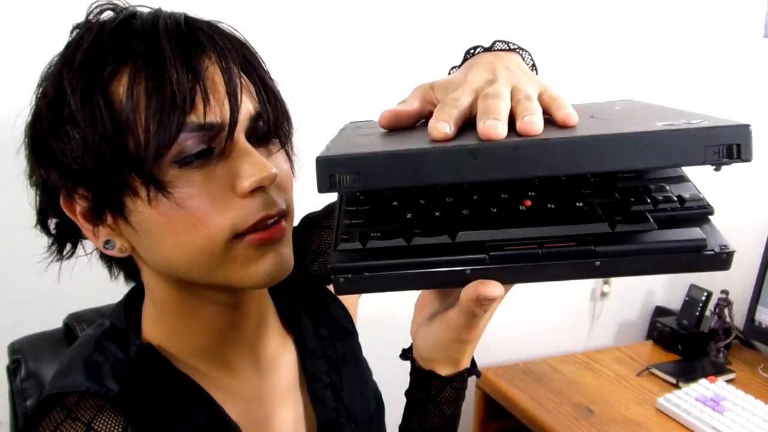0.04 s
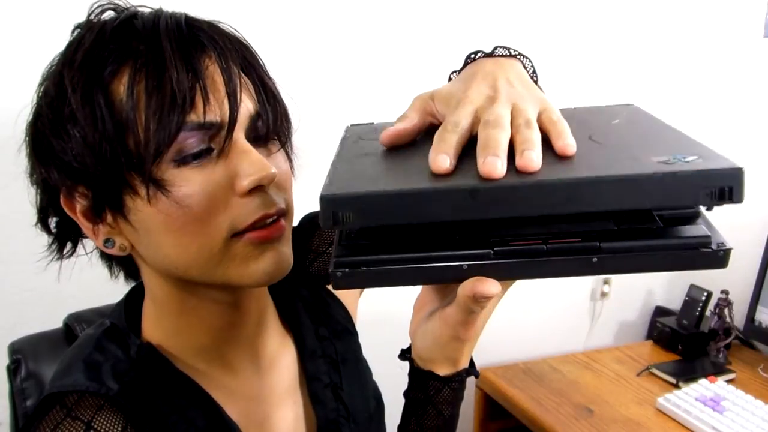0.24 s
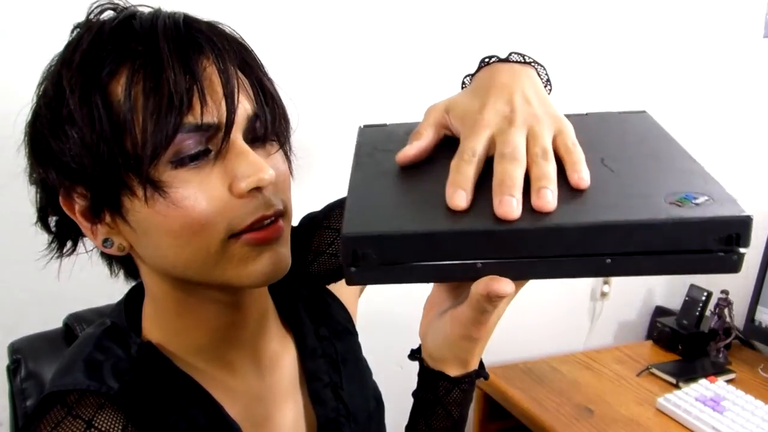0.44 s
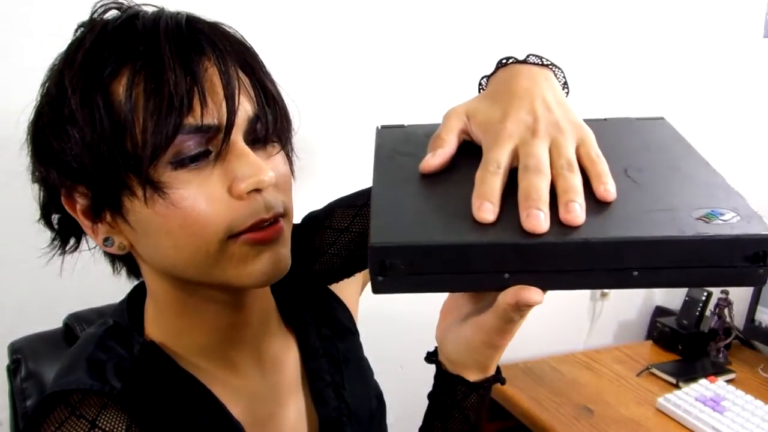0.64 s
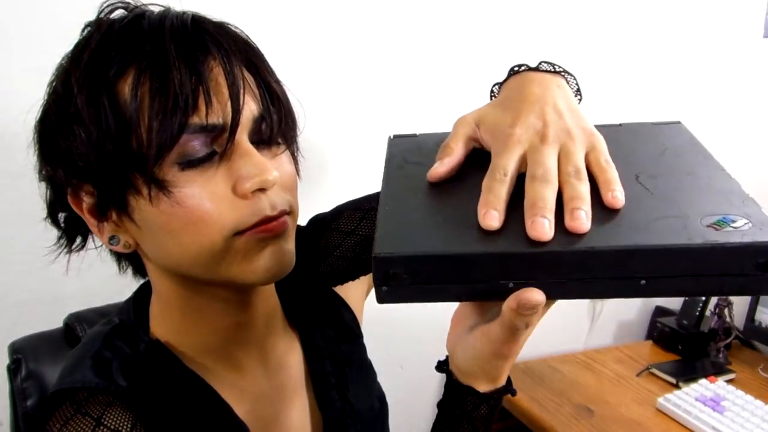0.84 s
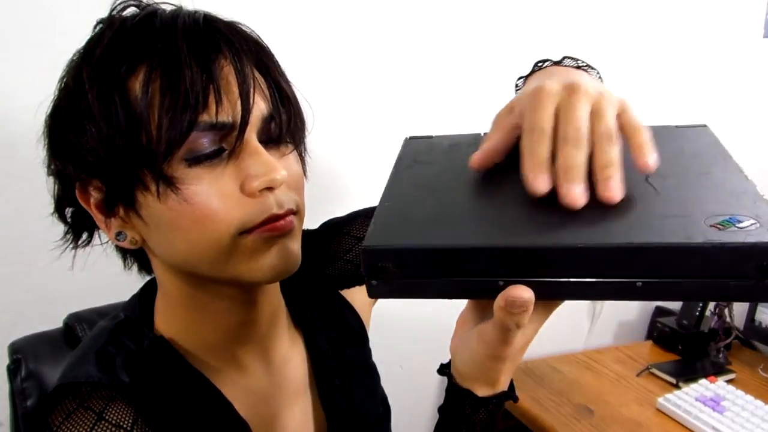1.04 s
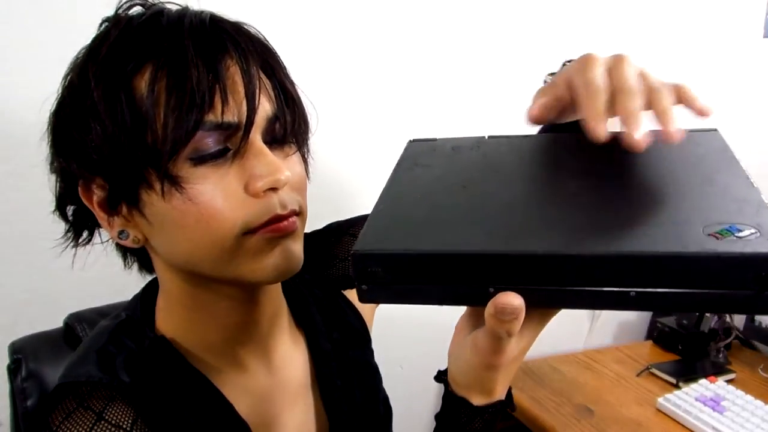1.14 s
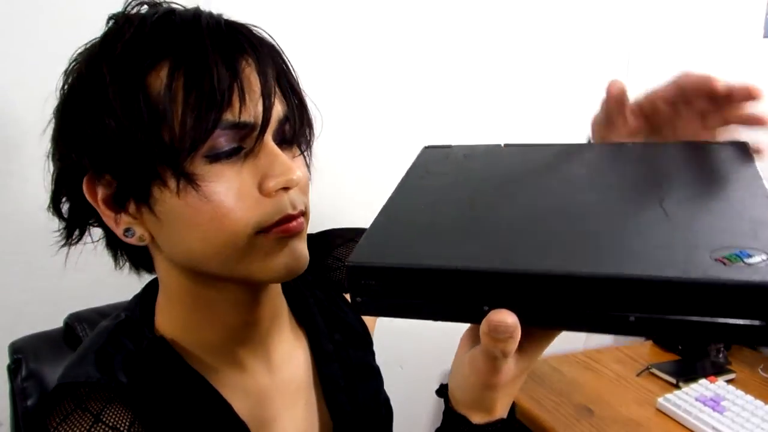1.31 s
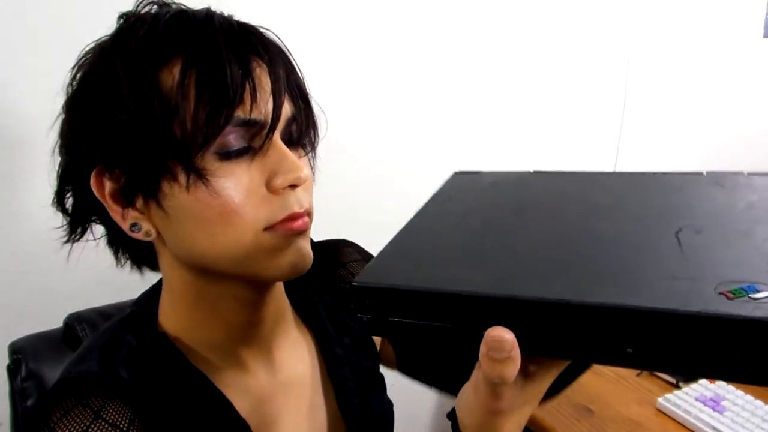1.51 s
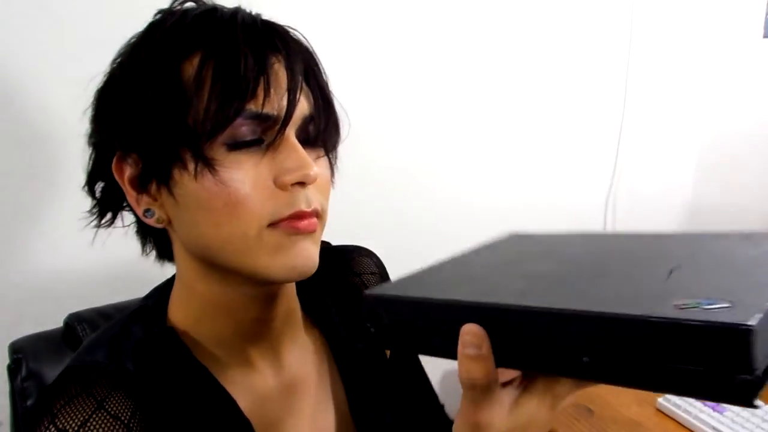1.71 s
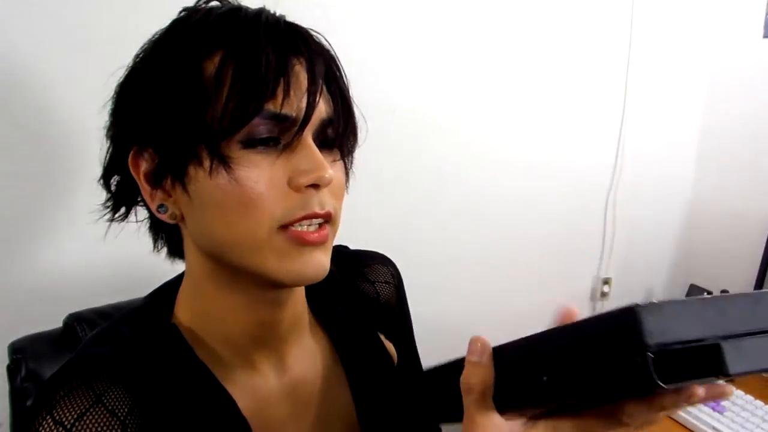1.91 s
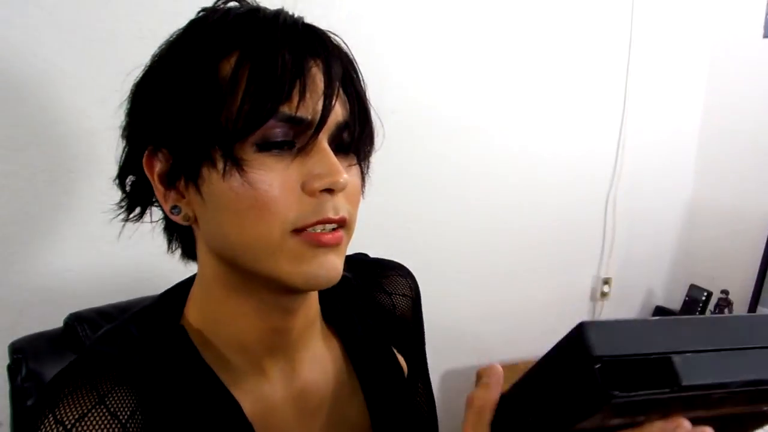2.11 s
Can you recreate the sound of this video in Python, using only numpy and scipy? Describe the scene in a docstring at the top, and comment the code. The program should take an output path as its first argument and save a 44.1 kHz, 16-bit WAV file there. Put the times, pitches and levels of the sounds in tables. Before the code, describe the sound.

An old laptop is pressed shut with three sharp plastic clacks, then handled.

```python
"""Three close plastic clacks, each a light touch and then a hard hit: an old laptop is pressed shut.
The lid lands, snaps into its metal latch and seats; the panels crack and the hollow base thuds and rings.
Then the closed case is tipped away: hands rub and knock on it and a small loose part chatters.
A small room answers, over a faint hiss and the rumble of air pushed against the microphone."""
import sys
import numpy as np
from scipy import signal
from scipy.fft import rfft, irfft
from scipy.io import wavfile

SR = 44100
rng = np.random.default_rng(int(sys.argv[2]) if len(sys.argv) > 2 else 0)


def generate_wav(signal):
    """Clip the signal to [-1, 1] and save it as 16-bit WAV at the path in sys.argv[1]."""
    frames = np.transpose(np.atleast_2d(signal))
    scaled = np.clip(frames, -1, 1) * 32767
    pcm = np.round(scaled).astype(np.int16)
    wavfile.write(sys.argv[1], SR, pcm)


N = 94991
T = np.arange(N) / SR
CASE_LOW_HZ = 520  # the case's panels and base sound only above this
# The three hard blows, each at another place on the case. Each row: start in seconds, thud level in dB.
BLOWS = [(.5135, -25), (.7450, -29.5), (.9772, -45.5)]


def from_db(db):
    """Decibels to gain."""
    return 10 ** (np.asarray(db) / 20)


def rms_one(x):
    """Scale to unit rms."""
    return x / np.sqrt(np.mean(x ** 2) + 1e-20)


def level(curve):
    """Gain over time from points in seconds and dB."""
    return from_db(np.interp(T, *np.transpose(curve)))


def at_hz(points, hz, column=1):
    """Read one column of a table on a log-frequency axis."""
    points = np.array(points)
    return np.interp(np.log(hz + 1), np.log(points[:, 0]), points[:, column])


def butter(x, hz, kind, order=2):
    """Causal Butterworth filter."""
    return signal.sosfilt(signal.butter(order, hz, kind, fs=SR, output="sos"), x + 1e-18)


def noise(colour):
    """Unit-rms noise with the given spectrum."""
    gain = from_db(at_hz(colour, np.fft.rfftfreq(N, 1 / SR)))
    return rms_one(irfft(rfft(rng.standard_normal(N)) * gain, N))


def clicks(starts, db):
    """Impulses at the given times and strengths."""
    out = np.zeros(N)
    np.add.at(out, (np.asarray(starts) * SR).astype(int), from_db(db))
    return out


def ring(force, hz, t60):
    """One mode: a unit click sets a sine of height 1 ringing."""
    r, w = np.exp(-np.log(1000) / (t60 * SR)), 2 * np.pi * hz / SR
    return signal.lfilter([0, np.sin(w)], [1, -2 * r * np.cos(w), r * r], force + 1e-18)


def burst(start, t60):
    """Envelope that jumps to 1 and dies away."""
    return (T >= start) * np.exp(-np.log(1000) * np.maximum(T - start, 0) / t60)


def hiss():
    """A faint, steady bed of noise."""
    # Its colour. Each row: frequency in Hz, relative density in dB.
    colour = [(30, 0), (100, -7), (300, -14), (600, -17), (1000, -20), (2200, -24), (3100, -21),
              (4000, -25), (7000, -23), (16000, -22)]
    return from_db(-72) * noise(colour)


def air_rumble():
    """Air pushed against the microphone: two independent deep rumbles that swell together."""
    # The swells. Each row: time in seconds, level in dB.
    swells = [(0, -66.5), (.46, -71), (.505, -43.5), (.59, -57), (.75, -70), (.85, -76), (1.3, -89.5),
              (1.8, -70.5), (1.96, -53), (2.15, -53)]
    return level(swells) * rms_one(butter(rng.standard_normal((2, N)), hz=49, kind="low"))


def room(x):
    """Diffuse reflections, new at each call, build quickly and die at their own rate per half octave."""
    # The room's tail. Each row: frequency in Hz, level against the input in dB, t60 in seconds.
    reverb = [(350, -7.5, .22), (614, -10, .24), (820, -10, .23), (1050, -7.5, .27), (1330, -4.5, .34),
              (1800, -4, .31), (2400, -4, .3), (3400, -6.5, .3), (4900, -6.5, .31), (7800, -8.5, .32),
              (11000, -8, 0.16), (16000, -8.5, 0.2)]
    delay_s, build_s = .004, .0036
    t = T[:SR // 2]
    edges = np.geomspace(60, 17000, 17)
    white, f = rfft(rng.standard_normal(len(t))), np.fft.rfftfreq(len(t), 1 / SR)
    build = np.clip((t - delay_s) / build_s, 0, 1)
    response = 0
    for low, high in zip(edges, edges[1:]):
        hz = np.sqrt(low * high)
        band = irfft(white * (f >= low) * (f < high), len(t))
        decay = np.exp(-np.log(1000) * t / at_hz(reverb, hz, column=2))
        unity_gain = np.sqrt(2 * (high - low) / SR / len(t))
        response += from_db(at_hz(reverb, hz)) * unity_gain * rms_one(band * build * decay)
    return signal.fftconvolve(x, response)[:N]


def hand_rub():
    """Skin sticks and slips on the plastic: faintly grainy friction with the case's hollow colour."""
    # The strength of the rubbing. Each row: time in seconds, level in dB.
    strength = [(.36, -69.5), (.44, -63.5), (.47, -59), (.50, -58.5), (.62, -64.5), (.71, -55),
                (.96, -56.5), (1.12, -66.5), (1.38, -81.5), (1.48, -71.5), (1.68, -71), (1.78, -60.5),
                (1.84, -52.5), (1.90, -51.5), (2.02, -48), (2.08, -54.5), (2.15, -48.5)]
    # Its colour. Each row: frequency in Hz, relative density in dB.
    colour = [(60, -13), (300, -15.5), (600, -5.5), (850, -7), (1130, -6), (1600, -10.5), (3000, -14),
              (6000, -17), (9000, -17.5), (16000, -32)]
    grain_db, grain_hz = 0.5, 150
    grain = from_db(grain_db * rms_one(butter(rng.standard_normal(N), grain_hz, "low")))
    return level(strength) * rms_one(noise(colour) * grain)


def palm_drags():
    """The case drags over the palm: friction swells and fades in the band of the rubbed panel."""
    # Short slips. Each row: start and length in seconds, level in dB, low and high band edge in Hz.
    slips = [(1.601, 0.068, -65, 1193, 2144), (1.794, 0.095, -40.5, 780, 1293),
             (1.998, 0.051, -41, 865, 1310)]
    out = np.zeros(N)
    for start, length, db, *band_hz in slips:
        swell = np.sin(np.pi * np.clip((T - start) / length, 0, 1))
        out += from_db(db) * swell * rms_one(butter(rng.standard_normal(N), band_hz, "band"))
    return out


def loose_part():
    """A small hard part bounces and scrapes in a quick, bright run."""
    # Its bounces. Each row: start in seconds, strength in dB.
    bounces = [(1.9478, -27.5), (1.9510, -30), (1.954, -28), (1.9598, -43), (1.9685, -30.5)]
    # Its modes. Each row: frequency in Hz, relative level in dB, t60 in seconds.
    modes = [(4360, -13, 0.03), (4850, -5, 0.02), (5270, -10, 0.02)]
    # The colour of its scrape. Each row: frequency in Hz, relative density in dB.
    colour = [(1000, -18), (3300, -15), (4900, 3), (6500, -13.5), (9300, -5), (10800, -22.5),
              (13500, -11.5), (16000, -16)]
    force = clicks(*np.transpose(bounces))
    rings = sum(from_db(db) * ring(force, hz, t60) for hz, db, t60 in modes)
    scrape = sum(from_db(db) * burst(start, t60=0.041) for start, db in bounces)
    return butter(rings, 2500, "high") + scrape * noise(colour)


def thud():
    """The whole laptop gives under each blow with a low bump."""
    # Its lowest modes. Each row: frequency in Hz, relative level in dB, t60 in seconds.
    modes = [(96.2, 1.5, 0.025), (251, -0.5, 0.027)]
    force = clicks(*np.transpose(BLOWS))
    return butter(sum(from_db(db) * ring(force, hz, t60) for hz, db, t60 in modes), 62.6, "high")


def hollow_base():
    """The base rings on after each blow, with a mix of modes set by the place struck."""
    # Its modes. Each row: frequency in Hz, level in dB at the first, second and third blow.
    modes = [(573, -39.5, -27, -25.5), (805, -23, -46.5, -73), (857, -24, -44, -57),
             (1012, -35.5, -30.5, -37), (1082, -24.5, -32, -47.5), (1176, -36, -27.5, -52.5),
             (1223, -23, -33, -62.5), (1385, -31, -31, -36.5), (1522, -34, -33.5, -40),
             (1710, -35, -47, -39.5), (2172, -44.5, -34, -46)]
    starts = [start for start, _ in BLOWS]
    rings = sum(ring(clicks(starts, blow_db), hz, t60=.18) for hz, *blow_db in modes)
    return butter(rings, CASE_LOW_HZ, "high", order=4)


def latch():
    """The metal latch springs into its catch and rings once, its modes alternating in polarity."""
    # Its modes. Each row: frequency in Hz, level in dB, t60 in seconds.
    modes = [(4380, -25, .025), (4920, -29, .05), (5600, -30, .04), (6200, -37, .1), (6601, -32, .13),
             (7640, -23, .02), (8650, -26, .025), (9154, -36, .11), (10400, -22, .035), (11780, -33, .07),
             (12780, -24, .035)]
    snap = clicks(starts=[.7455], db=0)
    return sum((-1) ** k * from_db(db) * ring(snap, hz, t60) for k, (hz, db, t60) in enumerate(modes))


def case_hit(place, start, db, tilt_db, crack_db, crack_t60):
    """A contact knocks the panels with a short crack; place is 0-2 for the blows, 3 for the hands."""
    # The well-damped plastic panels. Each row: frequency in Hz, t60 in seconds,
    # relative level in dB at the first, second and third blow and under the hands.
    panels = [(620, .016, -6, -8, -7, -7), (800, .011, -6, -18, -17, -13), (1110, .009, -1, 2, -2, 0),
              (1310, .009, -2, 2, -2, -6), (1600, .0087, -13, -14, -16, -15),
              (1884, .01, -13.5, -19, -15, -15), (2270, .01, -20, -12, -16, -13),
              (2600, .014, -26, -12, -18, -17), (3070, .005, -21, -21, -11, -18),
              (4400, .009, -21, -14, -20, -36), (4880, .012, -18, -19, -26, -38)]
    # The colour of the crack. Each row: frequency in Hz, relative density in dB.
    colour = [(200, -27), (1000, 9.5), (2000, -3.5), (4500, 0.5), (6000, -1.5), (8500, 1), (11000, -9),
              (16000, -8.5)]
    force = clicks([start], db)
    body = sum(from_db(place_db[place] + tilt_db * np.log2(hz / 1000)) * ring(force, hz, t60)
               for hz, t60, *place_db in panels)
    crack = from_db(crack_db) * noise(colour) * burst(start, crack_t60)
    return butter(body + crack, CASE_LOW_HZ, "high", order=4)


def hand_knocks():
    """Hands bump the closed case as it is tipped away."""
    # The bumps. Each row: start in seconds, panel level in dB, tilt in dB per octave,
    # crack level in dB, crack t60 in seconds.
    knocks = [(1.793, -34.5, 4.5, -66, .015), (1.835, -34, -3, -59, .02), (1.8561, -34.5, -3, -56, 0.0084),
              (1.8685, -25, -5.5, -39.5, 0.018), (2.029, -31.5, -0.5, -58, 0.017),
              (2.052, -37, 9, -62, .01)]
    return sum(case_hit(3, *knock) for knock in knocks)


def lid_clacks():
    """The lid meets the base in three clacks, each a cluster of contacts around one blow."""
    # Lid and latch contacts. Each row: start in seconds, panel level in dB, tilt in dB per octave,
    # crack level in dB, crack t60 in seconds.
    contacts = [(0.4336, -50.5, -6.5, -67.5, .01), (.5060, -21, -4, -26.5, 0.028),
                (0.5131, -13.5, -5.5, -27, 0.013), (0.5161, -8.5, 1, -17.5, 0.033),
                (0.524, -21.5, -0.5, -28, 0.011), (.5392, -20, -1.5, -32.5, 0.035),
                (0.7440, -21.5, -3, -29, 0.011), (0.7454, -10.5, -0.5, -3.5, 0.0095),
                (0.7471, -17.5, -4.5, -15.5, .04), (0.756, -24.5, 0.5, -19, 0.021),
                (0.9730, -21.5, 6.5, -36, 0.026), (0.9772, -13, -9, -17, 0.0037)]
    clacks = np.zeros((len(BLOWS), N))
    for start, *hit in contacts:
        nearest = np.argmin([abs(start - blow_s) for blow_s, _ in BLOWS])
        clacks[nearest] += case_hit(nearest, start, *hit)
    return clacks


def scene():
    """The laptop and its room, nearly mono, over hiss and air; each clack has its own reflections."""
    # Room sends for the three clacks and the handling. Each row: level in dB, treble cut in Hz.
    sends = [(-1, 12000), (0, 15000), (-2, 4000), (-3, 12000)]
    landing, snap, seating = lid_clacks()
    handling = hand_knocks() + hand_rub() + palm_drags()
    sounds = [landing, snap + latch(), seating, handling]
    chatter = loose_part()
    laptop = sum(x + from_db(db) * room(butter(x, cut_hz, "low", order=1))
                 for x, (db, cut_hz) in zip(sounds, sends))
    laptop += chatter + from_db(-7.5) * room(chatter) + hollow_base() + thud()
    air_mid, air_side = air_rumble()
    mid = laptop + air_mid + hiss()
    bright_reflections = butter(room(sum(sounds) + chatter), 3600, "high")
    side = from_db(-13) * bright_reflections + from_db(-26) * (air_side + hiss())
    return np.array([mid + side, mid - side])


def record(dry):
    """The loudest peaks are rounded and the top is cut."""
    ceiling, cutoff_hz = 1.2, 15800
    rounded = ceiling * np.tanh(dry / ceiling)
    return signal.sosfilt(signal.cheby1(12, .1, cutoff_hz, fs=SR, output="sos"), rounded)


dry = scene()
out = record(dry)
generate_wav(out)
```